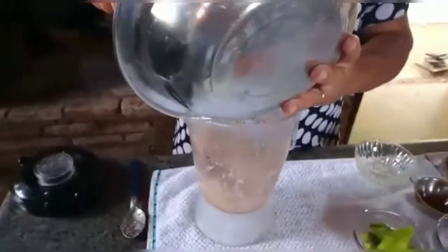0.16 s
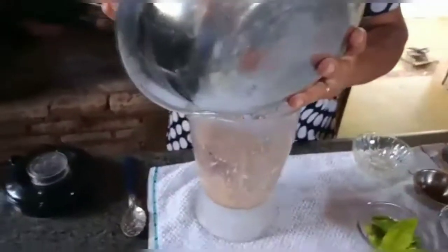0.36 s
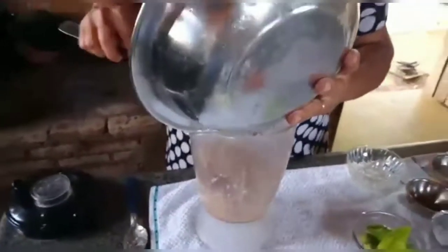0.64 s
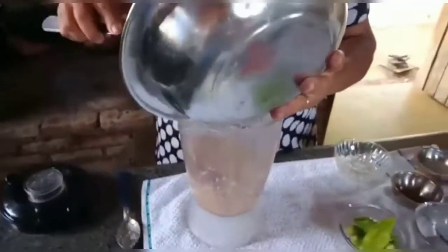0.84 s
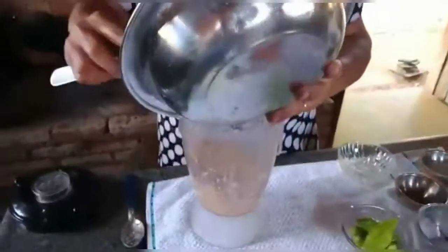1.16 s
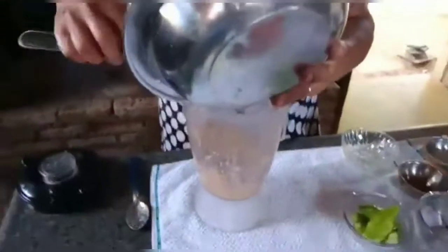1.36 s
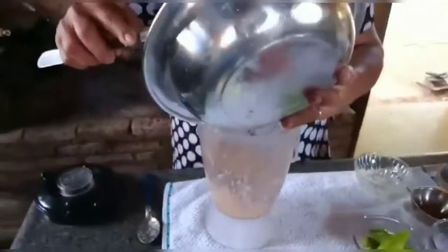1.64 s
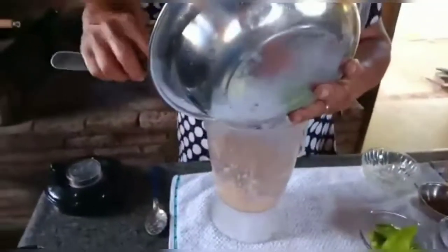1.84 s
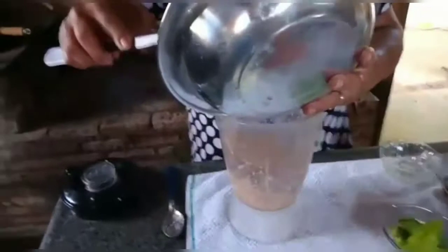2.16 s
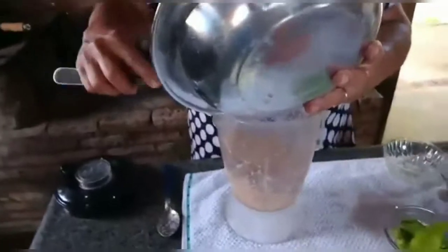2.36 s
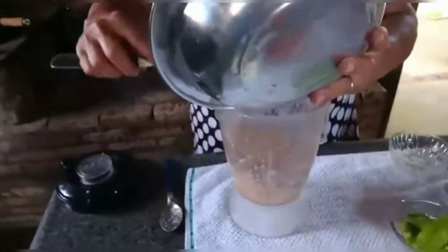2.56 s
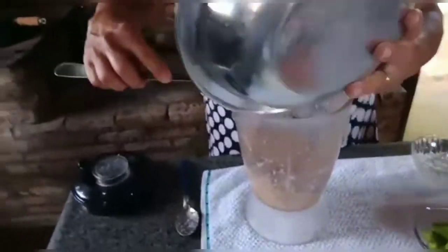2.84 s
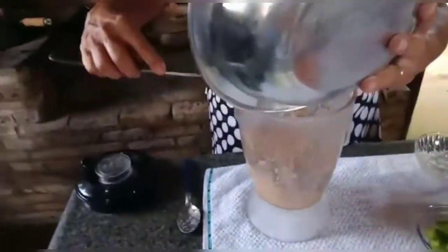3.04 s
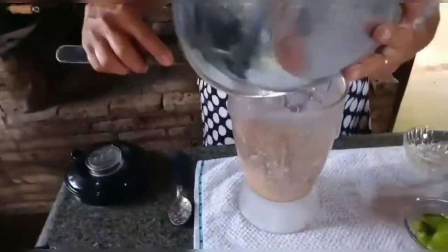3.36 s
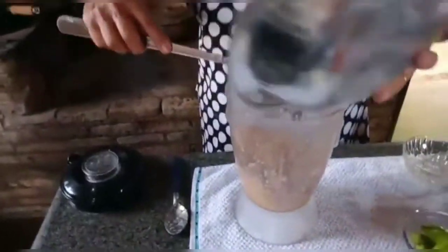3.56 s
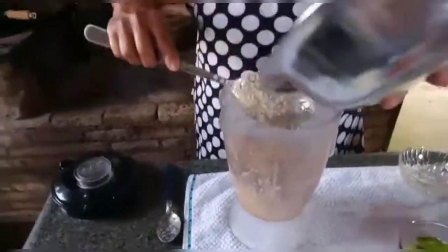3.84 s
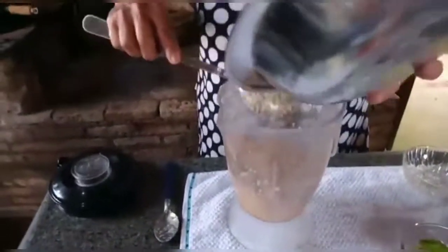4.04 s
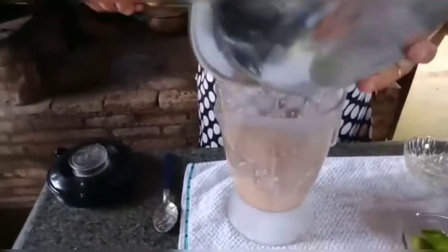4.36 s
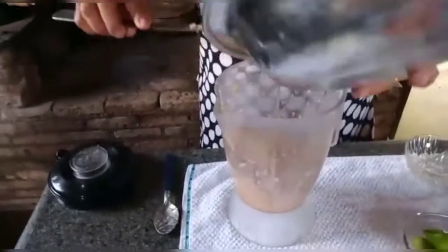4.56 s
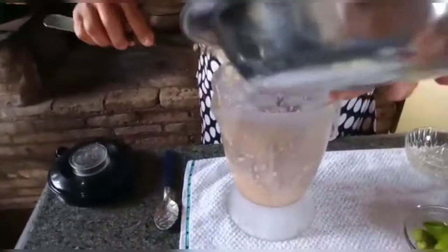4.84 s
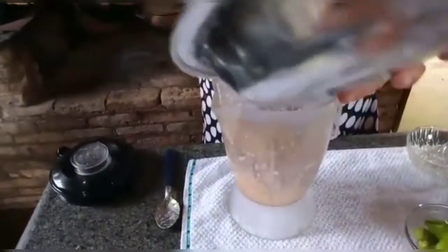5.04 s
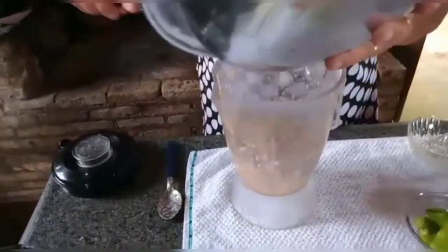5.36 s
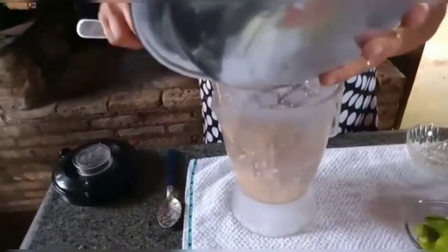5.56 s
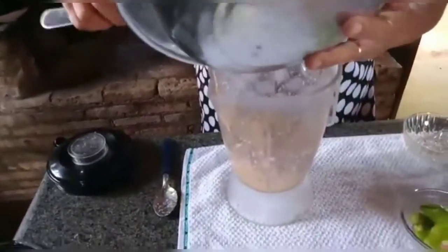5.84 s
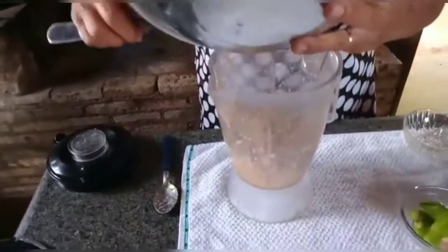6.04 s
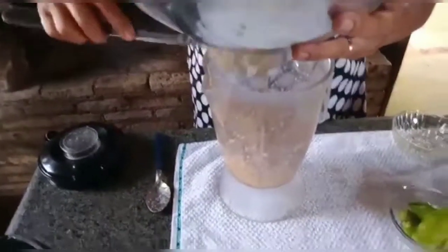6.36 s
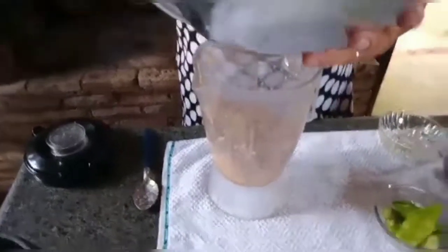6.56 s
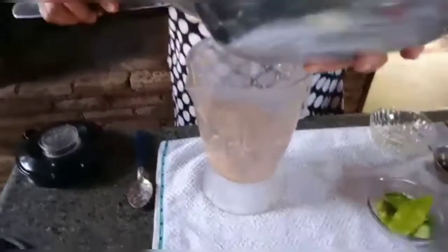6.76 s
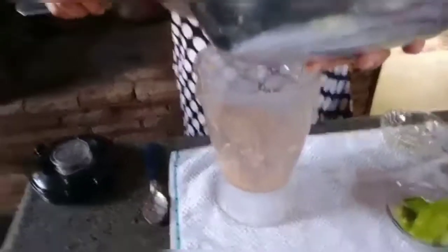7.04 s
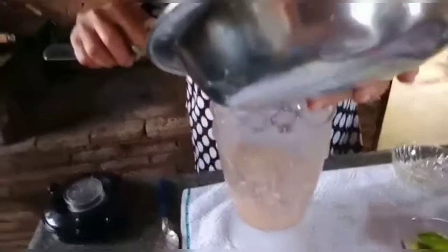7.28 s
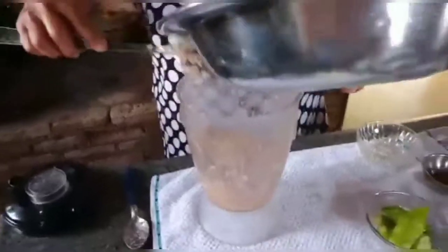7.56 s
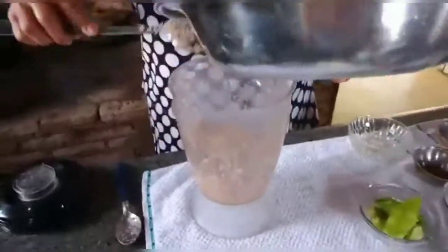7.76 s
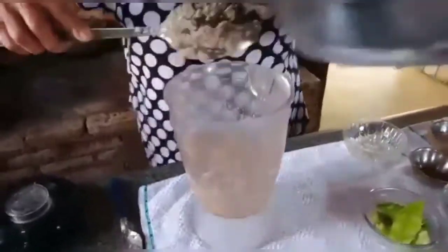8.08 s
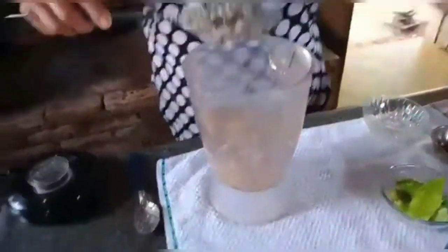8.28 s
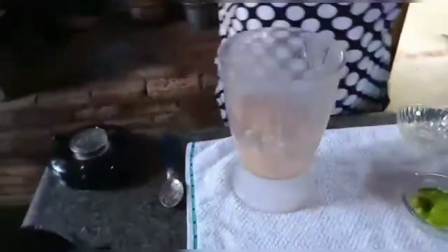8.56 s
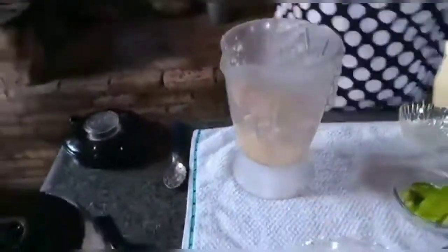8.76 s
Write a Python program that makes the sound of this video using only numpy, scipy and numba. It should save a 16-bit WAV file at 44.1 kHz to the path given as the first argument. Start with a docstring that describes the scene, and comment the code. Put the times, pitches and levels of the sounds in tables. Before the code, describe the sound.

A steel spoon clinks and scrapes gritty strokes inside a hand-held steel bowl, then raps dully on a plastic jar, in a small quiet kitchen.

```python
"""Sharp clinks and gritty rubbing of a steel spoon in a hand-held steel bowl, with dull raps on a plastic jar.
Knocks ring the bowl's modes (its natural pitches), and rubbing drives them with many tiny slips.
Squeaky groans, light slides, bright pings and one plop of food are added.
Behind them a small kitchen gives a short tail, a low hum and a thin hiss."""
import sys
import numpy as np
from scipy import signal
from scipy.io import wavfile
from scipy.ndimage import uniform_filter1d
from numba import njit

SR = 44100
rng = np.random.default_rng(int(sys.argv[2]) if len(sys.argv) > 2 else 0)


def transcribe(u):
    """Save the signal u as a 16-bit wav file named by the first command-line argument.

    u: samples, shape (n,) or (channels, n), limited to [-1, 1]; the rate is SR.
    q: integer samples, one column per channel.
    """
    v = np.clip(np.atleast_2d(u).T, -1, 1)
    q = np.round(v * 32767).astype(np.int16)
    wavfile.write(sys.argv[1], SR, q)


N = 392931  # length in samples
AIR_TOP_HZ = 13000
# natural pitches of the bowl, before each contact scales them: (pitch [Hz], level [dB], 60 dB ring time [s])
BOWL_MODES = [(368, -12.5, 0.4), (523, -21.5, 0.37), (724, -17.5, 0.2), (778, -16.5, 0.3), (867, -4, 0.19),
              (926, -7, 0.24), (985, -4.5, 0.26), (1061.5, -9, 0.22), (1120, -6.5, 0.11),
              (1307, -5.5, 0.25), (1390, -20, 0.076), (1528, -7.5, 0.1), (1686, -9.5, 0.17),
              (1790, -17.5, 0.12), (1997, -6, 0.38), (2458, 0, 0.13), (2706, -1.5, 0.12),
              (2865, -2.5, 0.038), (3250, -3.5, 0.06), (3610, -3, 0.031), (4080, -5, 0.028),
              (4500, -21.5, .15), (4950, -10, 0.1), (5230, -12, 0.15), (5420, -1.5, 0.2), (5650, -8, .1),
              (5880, -6, 0.065), (6480, -5, .15), (6230, -6.5, 0.022), (6830, -12.5, 0.053),
              (6310, -8, 0.14)]
# the bowl's longest-ringing mode, free when the hand grips loosely: (pitch [Hz], level [dB], ring time [s])
RIM_MODE = (587, 0, .45)


def undb(db):
    """Turn decibels into gain."""
    return np.exp(np.asarray(db) * np.log(10) / 20)


def unit(x):
    """Scale a sound to an rms (average strength) of 1."""
    return x / np.sqrt(np.mean(x ** 2))


def band(x, lo_hz, hi_hz, order=2):
    """Keep the pitches between two limits (Butterworth band-pass)."""
    return signal.sosfilt(signal.butter(order, [lo_hz, hi_hz], "band", fs=SR, output="sos"), x)


def curve(table):
    """Draw the columns of a table over time with straight lines."""
    s, *columns = np.transpose(table)
    return [np.interp(np.arange(N) / SR, s, column) for column in columns]


def walk(rate):
    """Wander in straight lines between random levels, rate of them a second; spread about 1.3."""
    hold = int(SR / rate)
    levels = np.repeat(rng.standard_normal(N // hold + 1), hold)
    return 1.595 * uniform_filter1d(levels, hold)[:N]


def swells(db, changes):
    """Give a steady level rounded swells and gaps."""
    t = np.arange(N) / SR
    return db + sum(change_db * np.exp(-((t - s) / half_s) ** 4) for s, half_s, change_db in changes)


def add(track, sound, s):
    """Mix a sound in at s seconds."""
    i = int(s * SR)
    track[i:i + len(sound)] += sound[:N - i]


def ring(modes, gains_db, stretch, push_s):
    """Set off modes with one push; a longer contact drives the treble less."""
    hz, db, t60 = np.array(modes).T[:, :, None]
    longest_s = 0.5
    t = np.arange(int(min(longest_s, t60.max() * stretch + push_s) * SR)) / SR
    fade_db = db + gains_db[:, None] - 60 * t / (t60 * stretch)
    tones = undb(fade_db) * np.sin(2 * np.pi * hz * t)
    push = np.hanning(int(push_s * SR) + 3)
    return np.convolve(tones.sum(axis=0), push / push.sum())[:len(t)]


def burst(lo_hz, hi_hz, t60):
    """Make a short spray of many blended modes from fading noise; peak 1."""
    t = np.arange(int(.15 * SR)) / SR
    x = band(rng.standard_normal(len(t)) * undb(-60 * t / t60), lo_hz, hi_hz)
    return x / np.abs(x).max()


def nearness_db(hz, best_hz, db_per_octave):
    """Weaken modes far from the pitch that the contact point drives best."""
    return -db_per_octave * np.abs(np.log2(hz / best_hz))


def kitchen():
    """Sum a wavering hum with its octave, a narrow drone and a thin hiss whose bands flicker."""
    # swells and gaps of each part: (middle [s], half length [s], level change [dB])
    hum_changes = [(2.94, 0.38, -30.5), (7.97, 0.39, -19.5), (8.91, 0.1, -8), (8.52, .3, -4),
                   (0.65, 1.4, -2)]
    octave_changes = [(1, 1, -19), (2.95, 1, 11), (7.049, 0.25, 6.5), (7.9, 0.43, -10.5)]
    drone_changes = [(3.2, 0.61, 3.5), (5.902, 0.4, 5.7), (7.05, 0.36, 12), (7.72, 0.16, 17.5),
                     (8.5, 0.19, 7.4)]
    treble_changes = [(0, 0.21, 5), (4.7, 0.23, -9), (6.4, 0.29, 3.5), (8.448, 0.27, 5), (8.91, 0.49, -3.5)]  # hiss above 900 Hz
    murmur_changes = [(0, 0.57, 12), (2.8, 0.71, -0.5), (4.4, 0.38, 1.5), (7.101, .7, 4.5),
                      (8.45, 0.25, 11)]  # hiss up to 900 Hz
    # tone colour of the hiss, before the overall level: (pitch [Hz], level [dB per Hz])
    hiss_colour = [(30, -17), (60, -4), (100, 1.5), (180, -3), (330, -9), (520, -3), (750, -18),
                   (1200, -23.5), (2500, -21.5), (4500, -17.5), (6200, -13), (9000, -36), (13500, -20.5)]
    hum_hz = 124.2
    hum_db, octave_db = swells(-54, hum_changes), swells(-68.5, octave_changes)
    drone_db = swells(-75, drone_changes)
    phase = 2 * np.pi * np.cumsum(hum_hz * (1 + .012 * walk(25))) / SR
    hum = undb(hum_db + 1.9 * walk(7.1)) * np.sin(phase)
    octave = undb(octave_db + 0.78 * walk(8.8)) * np.sin(2 * phase)
    out = np.sqrt(2) * (hum + octave)
    out += undb(drone_db + 2.0 * walk(13)) * unit(band(rng.standard_normal(N), 318, 344))
    treble_db, murmur_db = swells(-56.5, treble_changes), swells(-62, murmur_changes) - 3
    colour_hz, colour_db = np.transpose(hiss_colour)
    for hz in 36 * 2 ** np.arange(0, 8.6, 1 / 3):  # bands a third of an octave wide
        # a wider band holds more noise
        db = np.interp(np.log(hz), np.log(colour_hz), colour_db) + 10 * np.log10(hz) - 34.5
        part_db, flicker_db = (treble_db, 1.5) if hz > 900 else (murmur_db, 4.0)
        db = db + part_db + flicker_db * walk(6.1) + 0.59 * walk(47)
        out += undb(db) * unit(band(rng.standard_normal(N), hz / 2 ** (1 / 6), hz * 2 ** (1 / 6)))
    return out


def slides():
    """Echo a fading hiss in a narrow gap, which leaves evenly spaced bands."""
    # light slides: (time [s], length [s], level [dB], band spacing [Hz], echo share [0-1], top pitch [Hz])
    light_touches = [(4.303, 0.155, -34.5, 1920, .45, 7000), (5.899, 0.112, -48, 1558, .85, 7200)]
    out = np.zeros(N)
    for s, length_s, db, spacing_hz, echo, top_hz in light_touches:
        t = np.arange(int(length_s * SR)) / SR
        loop = np.r_[1, np.zeros(round(SR / spacing_hz) - 1), -min(echo, .93)]
        hiss = band(rng.standard_normal(len(t)), 2600, top_hz)
        banded = unit(signal.lfilter([1], loop, hiss))
        add(out, undb(db - 14 * t / length_s) * np.minimum(t / 0.03, 1) * banded, s)
    return out


def pings():
    """Let the edge glance off: two narrow clusters of modes with a soft rise, and a little broad spray."""
    # (time [s], level [dB], pitch [Hz], second pitch [Hz], 60 dB ring time [s])
    glances = [(.46, -30, 3200, 6300, .04), (.487, -29, 5750, 6400, .05), (.542, -26, 5800, 2650, .04),
               (.579, -27, 6300, 3500, .04), (.597, -28, 5300, 3000, .05), (.66, -21, 3900, 2080, .04),
               (1.278, -24, 5300, 4700, .05), (1.745, -28, 5200, 2800, .04), (1.763, -24, 6000, 2800, .04),
               (1.785, -21, 3500, 6400, .05), (1.797, -22, 6400, 2000, .04), (1.811, -21, 5200, 2800, .04),
               (2.222, -20, 3400, 6250, .05), (2.237, -20, 2850, 6600, .06), (2.353, -25, 4800, 5600, .04),
               (4.76, -18, 3900, 5450, .06), (6.168, -25, 5900, 5000, .05), (6.242, -23, 6100, 5400, .04),
               (6.288, -23, 4900, 3200, .04), (6.371, -15, 5400, 4100, .025), (6.75, -17, 4100, 3300, .08),
               (6.763, -17, 3300, 4100, .06), (6.7935, -10, 5450, 3000, .025),
               (6.8015, -10, 4000, 5900, .025), (7.359, -14, 3400, 4100, .03)]
    rise_s, half_width = .0008, .09  # half width as a share of the pitch
    out = np.zeros(N)
    for s, db, hz, second_hz, t60 in glances:
        sound = undb(-6) * burst(2500, 13000, t60 / 2)
        for part_hz, part_db in ((hz, 0), (second_hz, -5)):
            sound += undb(part_db) * burst(part_hz * (1 - half_width), part_hz * (1 + half_width), t60)
        rise = 1 - np.exp(-np.arange(len(sound)) / (rise_s * SR))
        add(out, undb(db - 2) * sound * rise, s)
    return out


@njit
def glide(x, hz, share):
    """Filter with a moving band-pass (state-variable type); width = share of the centre."""
    y, band_state, low_state = np.empty(len(x)), 0., 0.
    for i in range(len(x)):
        g = np.tan(np.pi * hz[i] / SR)
        v = (band_state + g * (x[i] - low_state)) / (1 + g * (g + share))
        band_state = 2 * v - band_state
        low_state += 2 * g * v
        y[i] = share * v
    return y


def even(x, hz, share):
    """Take a gliding band of white noise, kept near rms 1 as its width changes."""
    return glide(x, hz, share) / np.sqrt(np.pi * share * hz / SR)


def slips():
    """Scatter dense uneven slips of the spoon's edge in clumps, with stronger snags; rms 1."""
    snags_per_s, snag_db, soft_limit = 90, 10, 3.5  # soft limit in times rms
    grains = rng.standard_normal(N) * undb(1.9 * rng.exponential(size=N))
    snag_hits = (rng.random(N) < snags_per_s / SR) * rng.random(N)
    snags = signal.lfilter([1], [1, -.985], snag_hits)  # each snag dies away
    clumps = undb(2.6 * walk(90) + 2.0 * walk(250))
    rough = unit(grains * clumps * (1 + undb(snag_db) * snags ** 2 / 2))
    return unit(np.tanh(rough / soft_limit))


def groans():
    """Let the edge stick and slip regularly: a wavering pitch with overtones, blurred by uneven slips."""
    # (time [s], length [s], start pitch [Hz], end pitch [Hz], level [dB], overtones [dB per octave])
    squeaks = [(6.22, .08, 3220, 3220, -42, -30), (0.602, 0.035, 915, 880, -49, -10),
               (1.14, 0.022, 705, 720, -34, -12), (1.161, 0.078, 721, 642, -31, -17),
               (1.22, .06, 1097, 1240, -38, -25), (1.271, 0.092, 695, 900, -31, -18),
               (1.28, 0.065, 1226, 1480, -39, -20), (1.811, 0.086, 800, 845, -38, -7),
               (2.232, 0.045, 2900, 2750, -34, -20), (2.205, .035, 6150, 6300, -36, -30),
               (2.24, .03, 2000, 1650, -37, -20), (2.263, 0.042, 690, 888, -34, -7),
               (2.298, 0.045, 879, 649, -31, -10), (2.275, 0.026, 3570, 3540, -35, -20),
               (2.3, 0.032, 3050, 2800, -33.5, -23), (2.305, 0.039, 3710, 3460, -37.5, -16),
               (2.305, 0.043, 2300, 2090, -34, -14), (3.404, 0.045, 920, 987, -42, -7),
               (4.545, 0.13, 1560, 1660, -25.5, -19), (4.59, 0.081, 1996, 1970, -30.5, -12),
               (4.585, .045, 2680, 2694, -33, -13), (4.731, 0.041, 1600, 1740, -42, -14),
               (5.387, 0.027, 934, 934, -27, -19), (6.66, 0.037, 1343, 1467, -32.5, -11),
               (6.698, 0.07, 1500, 1626, -32.5, -15), (6.746, 0.026, 2450, 2400, -26.5, -17),
               (6.756, .07, 1404, 1325, -38.5, -20), (6.108, 0.067, 1020, 990, -43, -14),
               (6.2, .06, 830, 950, -44, -12), (5.355, 0.028, 1700, 2290, -31.5, -15.5),
               (4.481, .07, 985, 1007, -36, -14), (4.601, 0.078, 897, 1080, -36.5, -15),
               (7.215, .12, 2000, 1990, -39, -25), (7.225, .055, 2450, 2450, -37, -25),
               (7.285, .04, 2650, 2650, -41, -25), (4.59, .06, 5400, 5420, -33, -30),
               (4.565, .025, 5400, 5350, -36, -30), (6.67, .055, 6500, 6450, -36, -30),
               (6.725, .05, 6500, 6400, -35, -30), (6.69, .08, 5450, 5450, -35, -30),
               (7.321, 0.031, 852, 863, -34, -17), (7.325, 0.034, 1517, 1400, -34.5, -17)]
    blur_hz = 110  # blur width at the start pitch
    clean_share = .7
    out, edge = np.zeros(N), slips()
    wobble_hz, flutter_db = 25 * walk(120), 3 * walk(140)
    for s, length_s, start_hz, end_hz, db, tilt_db in squeaks:
        i = int(s * SR) + np.arange(int(length_s * SR))
        pitch_hz = np.linspace(start_hz, end_hz, len(i))
        phase = 2 * np.pi * np.cumsum(pitch_hz + wobble_hz[i]) / SR
        gain = undb(db + 1.0) * signal.windows.tukey(len(i), .6)
        for k in range(1, min(6, int(AIR_TOP_HZ / start_hz) + 1)):
            clean = np.sqrt(2) * undb(flutter_db[i]) * np.sin(k * phase)
            blur = even(edge[i], k * pitch_hz, blur_hz / start_hz)
            mix = clean_share * clean + np.sqrt(1 - clean_share ** 2) * blur
            out[i] += gain * undb(tilt_db * np.log2(k)) * mix
    return out


def contact():
    """List how the spoon presses and moves in every stroke and rattle, in time order.

    Rows: (time [s], level [dB], rumble [dB], rasp [dB], best-driven pitch [Hz], rasp pitch [Hz],
    rim tone [dB], grit [0-1], sizzle [dB])."""
    # rubbing, one list a stroke: (time [s], level [dB], rasp above the level [dB], best-driven pitch [Hz])
    rubbing = [
        [(0.36, -39.5, -10.5, 877), (0.42, -40, -7, 2000), (0.454, -42, -2, 2700), (0.516, -43.5, -1, 2650),
         (0.55, -43, -1, 2650), (0.578, -46, 4, 2800), (0.606, -47, 4, 2000), (0.62, -49.5, -7.5, 1010)],
        [(1.04, -30, -11, 925), (1.096, -33, -9.5, 685), (1.134, -34, -8.5, 770), (1.172, -32, -7, 813),
         (1.272, -31.5, -4, 775), (1.292, -32.5, -3, 782), (1.368, -44.5, -8.5, 890), (1.385, -40.5, 0, 926)],
        [(1.614, -34.5, -1, 990), (1.648, -31.5, -10, 830), (1.67, -25.5, -8, 740), (1.736, -40.5, -12, 940),
         (1.75, -37, 2, 1650), (1.775, -38, 3, 1300), (1.8, -35, 3, 1300), (1.822, -34, 0, 900),
         (1.85, -31, -3, 900), (1.875, -38, 1.5, 985)],
        [(2.13, -56, -37, 911), (2.174, -31, -9, 800), (2.194, -23, -14.5, 700), (2.226, -35, 8, 1730),
         (2.242, -19, -9.5, 1740), (2.274, -43.5, 12.5, 890), (2.33, -28.5, -4, 1120), (2.36, -41, 3, 946)],
        [(2.58, -29.5, -17.5, 668), (2.608, -26.5, -11, 656), (2.656, -48.5, 14.5, 915),
         (2.666, -21.5, -15.5, 820), (2.762, -39, -13.5, 642), (2.818, -42, 2.5, 1100),
         (2.894, -52, 14.5, 1300), (2.95, -32.5, -1, 1360)],
        [(3.318, -32, -16.5, 951), (3.344, -20, -9, 880), (3.378, -36, -6.5, 676), (3.398, -34, 5, 640),
         (3.43, -37.5, 7.5, 780)],
        [(4.49, -37, -6.5, 1088), (4.516, -31.5, -7.5, 1160), (4.546, -29, -4, 1530),
         (4.616, -23.5, -3.5, 1780), (4.668, -31.5, -13.5, 1666), (4.704, -40.5, -8, 1530),
         (4.76, -37, 5, 1600), (4.775, -49.5, 14, 1660)],
        [(5.226, -24, -4, 885), (5.234, -28.5, -3.5, 846), (5.264, -17.5, -20, 640), (5.286, -35.5, 1, 668),
         (5.312, -30.5, -1.5, 764), (5.345, -37, -32, 657)],
        [(5.365, -24.5, -2, 960), (5.405, -21, -10, 933), (5.433, -31, -11.5, 952), (5.505, -37.5, -2, 1077),
         (5.515, -30.5, -17.5, 1130), (5.581, -49.5, 1.5, 1000), (5.625, -41, 1.5, 970), (5.7, -50, 12.5, 1160)],
        [(6.03, -22, -26, 635), (6.082, -27.5, -26.5, 595), (6.124, -39, -9, 621), (6.178, -40.5, 5.5, 1020),
         (6.192, -35.5, 3.5, 1290), (6.24, -42, 2.5, 1130), (6.264, -35, -3.5, 1390), (6.3, -47, 2, 1020)],
        [(6.642, -35.5, -12, 761), (6.66, -38, -8, 802), (6.668, -23, -22.5, 802), (6.694, -26, -7.5, 870),
         (6.718, -28, -6, 1566), (6.74, -33, 0.5, 2145), (6.752, -28, 6, 2260), (6.77, -29, 6, 2260),
         (6.782, -38, -8, 2110)],
        [(7.217, -31, -16, 1670), (7.261, -29, -20, 2300), (7.269, -32, -21, 2300), (7.301, -27.5, -19, 1840),
         (7.325, -34.5, -6, 1260), (7.335, -36, 6, 1200), (7.36, -38.5, 5, 1310)],
    ]
    # one row a stroke: (rumble above the level [dB], rasp pitch at the start [Hz], at the end [Hz],
    # rim tone as the grip allows [dB], sizzle above the rasp [dB])
    touch = [(-24, 5900, 5900, -14, 3), (-7, 6000, 5600, -5, 2), (-2, 6300, 5800, -12, 0),
             (-12, 6300, 5500, -16, 0), (-31, 6600, 5950, -9, 0), (-10.5, 6200, 6000, 4, -1),
             (-42, 5400, 5400, -13, 0), (-10, 5200, 5500, -3, -1), (-22, 5950, 6600, -12, -1),
             (-63, 5600, 5600, -4, 1), (-37, 6300, 5300, -15, -5), (-43, 4000, 5900, -13, -4)]
    # the spoon lifts after a stroke: (time after its end [s], level change [dB], rumble change [dB])
    lift = [(0.037, -25.5, 27), (.13, -32, -2)]
    # a lone blow leaves a rattle: (time [s], hold [s], level [dB], fall [dB per s], rumble [dB], rasp [dB],
    # best-driven pitch [Hz], rasp pitch [Hz])
    rattles = [(0.665, 0.0037, -33, 259, 7.5, -9, 1000, 3000),
               (3.767, 0.0053, -26, 191.5, 9, -11.5, 600, 3430),
               (3.952, .006, -25, 200.5, 9, -7, 573, 3380),
               (4.135, .006, -30, 206.5, 9.5, -11.5, 580, 3410),
               (6.389, .006, -45, 219.5, 11, 0.5, 590, 4450),
               (7.751, 0.027, -44.5, 507, -16, 8.5, 2150, 5430),
               (8.87, 0.017, -30, 896, -3.5, -1, 800, 4260)]
    heavy_db, heavy_fade_s = 16.5, 0.01  # a stroke starts heavy and thins out
    rattle_fall_db, rattle_rim_db, rattle_grit = 30.5, -15, .3  # smoother than a stroke (grit 1)
    tables = []
    for stroke, (rumble_db, start_hz, end_hz, rim_db, sizzle_db) in zip(rubbing, touch):
        start, (end, last_db, *rest) = stroke[0][0], stroke[-1]
        rows = []
        for s, db, rasp_db, best_hz in stroke:
            heavy_rumble_db = rumble_db + heavy_db * np.exp((start - s) / heavy_fade_s)
            rasp_hz = np.interp(s, [start, end], [start_hz, end_hz])
            rows.append((s, db, heavy_rumble_db, rasp_db, best_hz, rasp_hz, rim_db, 1, sizzle_db))
        for s, db, more_db in lift:
            rows.append((end + s, last_db + db, rumble_db + more_db, *rest, end_hz, rim_db, 1, sizzle_db))
        tables.append(rows)
    for s, hold_s, db, db_per_s, *colour in rattles:
        rest = (*colour, rattle_rim_db, rattle_grit, 0)
        fallen = (s + hold_s + rattle_fall_db / db_per_s, db - rattle_fall_db, *rest)
        tables.append([(s, db, *rest), (s + hold_s, db, *rest), fallen])
    tables.sort()
    # the next touch cuts a tail short
    cut = [[row for row in t if row[0] < after[0][0] - .02] for t, after in zip(tables, tables[1:])]
    return cut + tables[-1:]


def strokes(tables):
    """Join tables (time [s], level [dB], ..) into curves with near silence between them."""
    rows = []
    for t in tables:
        rows += [(t[0][0] - .008, -80, *t[0][2:]), *t, (t[-1][0] + .004, -80, *t[-1][2:])]
    return curve(rows)


def scrape():
    """Drive the bowl's modes with slips; which ones answer shifts as the edge travels."""
    db, rumble_db, rasp_db, best_hz, rasp_hz, rim_db, grit, sizzle_db = strokes(contact())
    edge = grit * slips() + np.sqrt(1 - grit ** 2) * rng.standard_normal(N)
    out = np.zeros(N)
    for hz, mode_db, t60 in [RIM_MODE, *BOWL_MODES]:
        rub_t60 = min(.5 * t60, 330 / hz)  # the resting spoon shortens the ring
        pole = np.exp(2j * np.pi * hz / SR - np.log(1000) / (rub_t60 * SR))
        if hz == RIM_MODE[0]:
            place_db = rim_db
        elif hz > 3000:
            place_db = rasp_db + nearness_db(hz, rasp_hz, 2.9)
        else:
            place_db = nearness_db(hz, best_hz, 9.3)
        # a rumbling, heavy contact also damps the shell
        damping_db = 0.38 * np.maximum(rumble_db + 3, 0)
        drive_db = db + mode_db + place_db - damping_db + 3.5 * walk(18)
        resonator = [0, pole.imag], [1, -2 * pole.real, abs(pole) ** 2]
        out += np.sqrt(1 - abs(pole) ** 2) * signal.lfilter(*resonator, edge * undb(drive_db - 7.0))
    # the many weak modes between the strong ones merge into noise: rasp, body, sizzle and rumble
    out += undb(db + rasp_db - 4 + 3.5 * grit * walk(60)) * even(edge, rasp_hz, share=.22)
    out += undb(db - 9 + 2.5 * grit * walk(35)) * even(edge, best_hz * 1.53, share=0.27)
    sizzle = unit(band(edge, 3700, 18000, order=1))
    out += undb(db + rasp_db + sizzle_db - 2 + 2.0 * grit * walk(35)) * sizzle
    out += undb(db + rumble_db - 8.5 + 2.0 * grit * walk(35)) * unit(band(edge, 120, 620))
    return out


def raps():
    """Ring dull, short modes of the plastic jar with a crack; food drops in with a soft plop."""
    # spoon on the jar: (time [s], level [dB], crack relative to it [dB])
    jar_blows = [(3.761, -1.5, -9), (3.946, -2.5, -8), (4.133, -2, -6.5)]
    # natural pitches of the jar, before the ring is shortened: (pitch [Hz], level [dB], ring time [s])
    jar_modes = [(216.5, -5, 0.29), (252, 0, 0.13), (405, -13.5, 0.19), (536, -9.5, 0.63),
                 (726, 3.5, 0.066), (1073, 0.5, 0.059), (1160, -20, 0.086), (1740, -9, 0.022),
                 (2040, 0.5, 0.055), (2590, -15.5, 0.1), (2560, -5, 0.052), (3670, -18, 0.032)]
    # food drops into the jar: (time [s], level [dB])
    plop_s, plop_db = (8.462, -32)
    out = np.zeros(N)
    scatter_db = 0.5 * rng.standard_normal((len(jar_blows), len(jar_modes)))
    for (s, db, crack_db), chance_db in zip(jar_blows, scatter_db):
        tone = ring(jar_modes, chance_db, 0.51, .0002)
        add(out, -undb(db - 7) * tone / np.abs(tone).max(), s)
        add(out, undb(db + crack_db) * burst(1200, 6100, 0.014), s)
    plop = ring([(224, 2.3, 0.13), (261.5, -1.6, 0.2)], np.zeros(2), 0.98, 0.0027)
    add(out, undb(plop_db) * plop, plop_s)
    add(out, undb(plop_db - 7.5) * burst(128, 450, 0.57), plop_s)
    return out


def knocks():
    """Build each blow from bowl modes, a crack, a thud of the held shell and a bright tick."""
    # spoon on bowl: (time [s], level [dB], thud [dB], tick [dB], best-driven pitch [Hz],
    # ring length [factor], rim tone [dB]); thud, tick and rim are relative to the level
    bowl_blows = [(0.33, -5.5, -53, -16, 910, 1.2, -43.5), (0.391, -19.5, -31, -10, 975, 0.52, -30),
                  (0.66, -11, -11.5, -4, 1050, 1.05, -29), (1.0215, -4.5, -7, -8, 1080, 1.5, -37.5),
                  (1.168, -15.5, -33, -23, 1500, 0.44, -40), (1.1748, -8, -44.5, -13, 1430, 0.8, -61),
                  (1.231, -14.5, -30, -12.5, 1200, .6, -39), (1.306, -20, -30, -10, 1390, 0.66, -43),
                  (1.336, -16.5, -30.5, -20, 1500, 0.4, -43.5), (1.361, -15, -36, -16, 620, 0.74, -19.5),
                  (1.6, -7.5, -10, -7, 1100, 1.8, -41), (1.663, -13.5, -35, -26, 507, 1.7, -35),
                  (1.691, -14, -6, -7, 800, 0.52, -33), (1.8455, -13, -20, -4, 900, .5, -35),
                  (1.827, -11, -11, -4.5, 790, 0.36, -23), (2.1143, -4, -5, -3, 507, 0.17, -27.5),
                  (2.137, -13.5, -11.5, -8.5, 540, 0.74, -26), (2.1792, -17.5, 4, -8, 690, 0.8, -16),
                  (2.282, -13, -30, 0, 2800, 1.1, -40), (2.361, -28.5, 4, 6, 576, 0.53, -7.5),
                  (2.563, -7, -9.5, -6.5, 720, 0.67, -18), (2.587, -13, -21, -6, 630, 0.58, -32),
                  (2.664, -8, -4, -16, 884, 1.7, -10), (2.716, -17, -26, -7, 580, 1.3, -5.5),
                  (2.928, -17.5, -12.5, -14, 1590, 0.57, -26), (3.24, -57.5, -14, 19, 2310, 1.07, -28),
                  (3.293, -6.5, -11, -8, 620, 3.4, -13), (3.305, -2.5, -36, -9.5, 989, 1.5, -38),
                  (3.335, -7, -37, -19, 1020, 2.1, -13), (3.405, -18, -31, -11, 2600, 0.9, -31.5),
                  (4.4738, -2, -24, -12, 2400, 0.97, -30.5), (4.491, -12, -30, -33.5, 1000, 3.7, -17),
                  (5.21, -6.5, -4.5, -3, 750, 0.17, -27), (5.225, -16, 1, -25, 584, 0.65, -8),
                  (5.291, -21.5, -12.5, -4, 624, 0.63, -8.5), (5.314, -10, -8.5, -8.5, 600, 0.48, -28),
                  (5.355, -8.5, -7, -4.5, 730, 0.66, -24), (5.397, -2.5, -28.5, -11.5, 1010, 1.2, -26),
                  (5.511, -11.5, -39, -15, 1145, 1.8, -25), (5.612, -20, -28.5, -0.5, 990, 2.7, -17),
                  (6.013, -5, -13, -10.5, 1320, 1.2, -11), (6.019, -8.5, -28.5, -10.5, 885, 1, -15.5),
                  (6.192, -21, -33, -8.5, 3000, 0.55, -45), (6.265, -15.5, -32, -9, 1930, 0.37, -35),
                  (6.371, -11.5, -24, -4.5, 1720, 0.17, -30.5), (6.628, -3, -64.5, -10, 1250, 0.53, -18),
                  (6.668, -6.5, -47.5, -10.5, 620, 1.3, -14.5), (7.2028, -5, -55, -12, 1830, 1.45, -21.5),
                  (7.747, -27, -21, -5, 2560, 0.86, -23), (8.869, -25, -24, 10.5, 520, 1, -15)]
    # upper modes of the rim, before the ring is shortened: (pitch [Hz], level [dB], ring time [s])
    upper_rim = [(1303, 0, .3), (1997, 0, .38), (2449, 0, .33)]
    # blows near the rim that leave those modes ringing: (time [s], then one level [dB] for each mode)
    clear_blows = [(3.293, -45, -41, -51.5), (3.334, -41.5, -61, -49.5), (4.473, -43, -37.5, -35),
                   (5.397, -34.5, -39, -47), (6.013, -29, -45.5, -43.5), (6.626, -44, -46.5, -44.5),
                   (7.202, -44, -32, -36)]
    out, hz = np.zeros(N), np.array(BOWL_MODES)[:, 0]
    scatter_db = 3.0 * rng.standard_normal((len(bowl_blows), len(BOWL_MODES)))
    for (s, db, thud_db, tick_db, best_hz, stretch, rim_db), chance_db in zip(bowl_blows, scatter_db):
        gains_db = chance_db + nearness_db(hz, best_hz, 34.0)
        tone = ring(BOWL_MODES, gains_db, np.clip(stretch, .2, 3) * 0.39, .00015)
        rim = ring([RIM_MODE], np.zeros(1), 0.86, .0004)
        thud = ring([(193, -3.0, 0.012), (255, -1.8, 0.023)], np.zeros(2), 0.93, 0.00026)
        blow = ring([(1500, 0, 0.0015)], np.zeros(1), 0.93, .0001)  # the hit itself
        add(out, -undb(db - 5.5) * tone / np.abs(tone).max(), s)
        add(out, undb(db + rim_db - 4.5) * rim, s)
        add(out, undb(db - 11.5) * burst(410, 1730, 0.056), s)  # crack
        add(out, -undb(db - 10) * blow, s)
        add(out, undb(db + thud_db - 3.0) * thud, s)
        add(out, undb(db + tick_db + 0.5) * burst(2502, 9000, 0.028), s)
    for s, *gains_db in clear_blows:
        add(out, ring(upper_rim, np.array(gains_db), 0.93, .0001), s)
    return out


def room(near):
    """Answer with a short echo from the walls: fading noise whose treble dies sooner."""
    t60_s, treble_t60_s = 0.33, .28
    t = np.arange(int(.5 * SR)) / SR
    low = band(rng.standard_normal(len(t)), 200, 1400, order=1) * undb(-60 * t / t60_s)
    high = band(rng.standard_normal(len(t)), 1600, 9200, order=1) * undb(-1.5 - 60 * t / treble_t60_s)
    tail = (low + high) * (t > .006)  # the walls answer after 6 ms
    return signal.fftconvolve(near, undb(-14.5) * tail / np.sqrt(np.sum(tail ** 2)))[:N]


def scene():
    """Put the bowl and jar close by, with their short echo, in the kitchen."""
    near = knocks() + raps() + scrape() + groans() + slides() + pings()
    high_pass = signal.butter(2, 115, "high", fs=SR, output="sos")
    close = signal.sosfilt(high_pass, near + room(near))
    return np.array([1, 1])[:, None] * (close + kitchen())


def record(dry):
    """Pass sound up to about 7 kHz and dim the rest; only the treble differs left and right; cut the top."""
    low_pass = signal.cheby1(4, 1.5, 6800, fs=SR, output="sos")
    mid = signal.sosfilt(low_pass, dry[0]) + undb(-10.0) * band(dry[0], 8960, AIR_TOP_HZ)
    side = band(mid * walk(400), 5620, 14000, order=8)
    wide = mid + undb(-11) * side * np.array([[1], [-1]])
    return signal.sosfilt(signal.ellip(8, .2, 60, 13300, fs=SR, output="sos"), wide)


dry = scene()
out = record(dry)
transcribe(out)
```